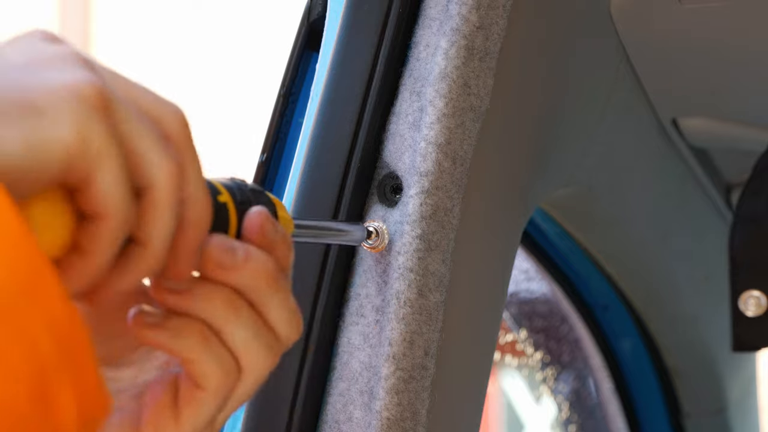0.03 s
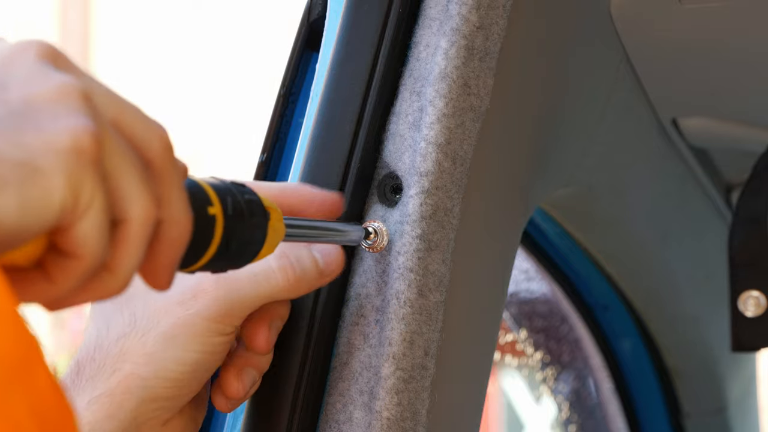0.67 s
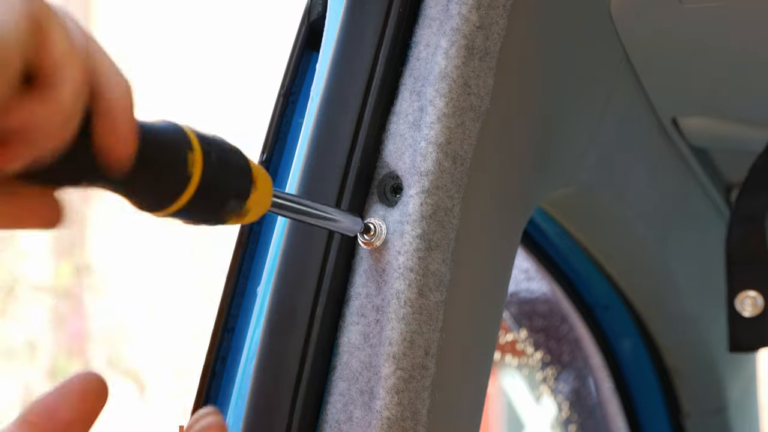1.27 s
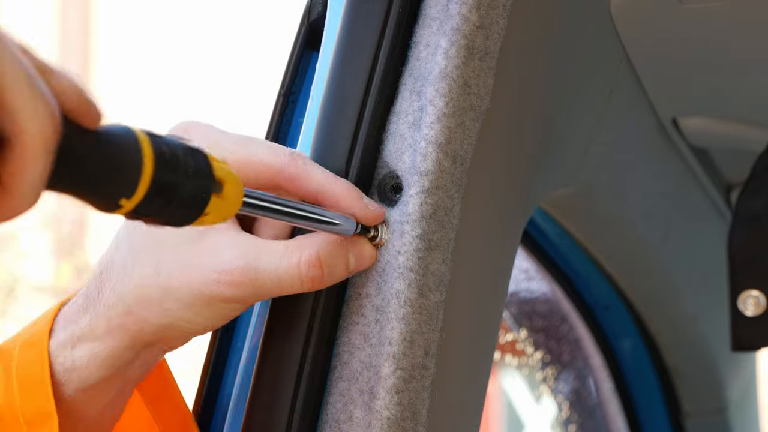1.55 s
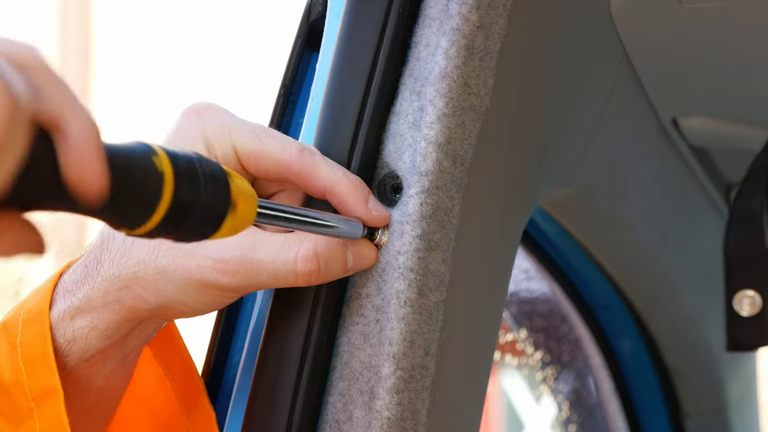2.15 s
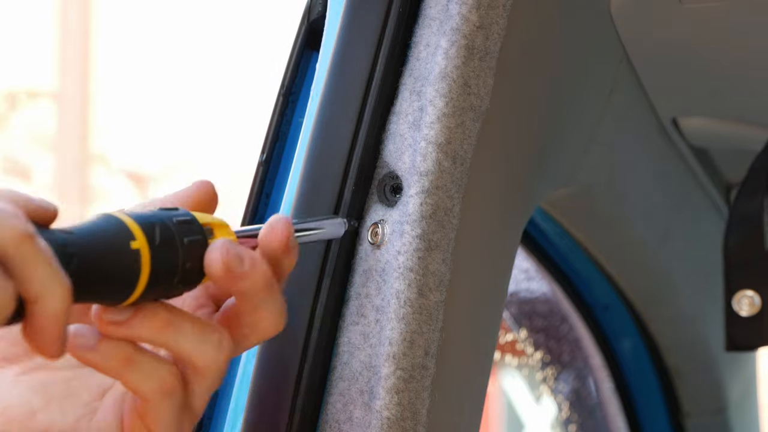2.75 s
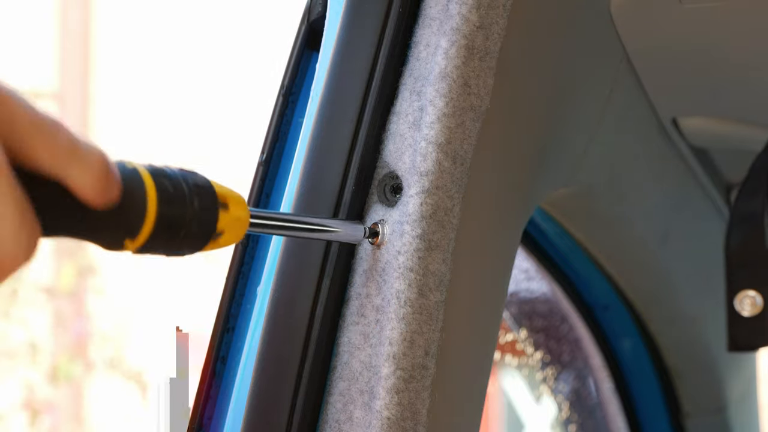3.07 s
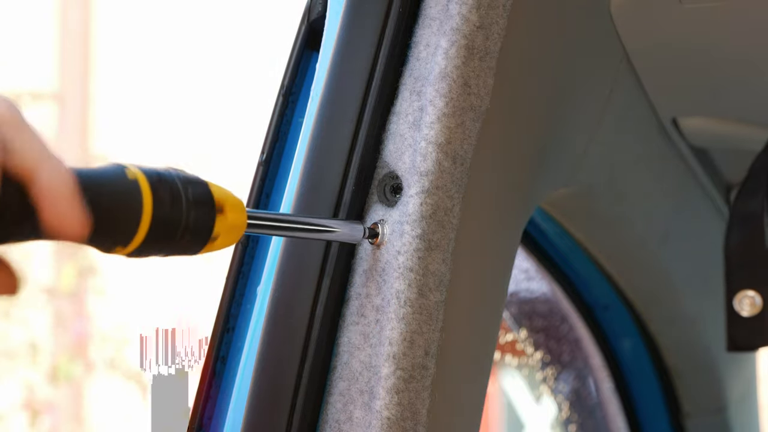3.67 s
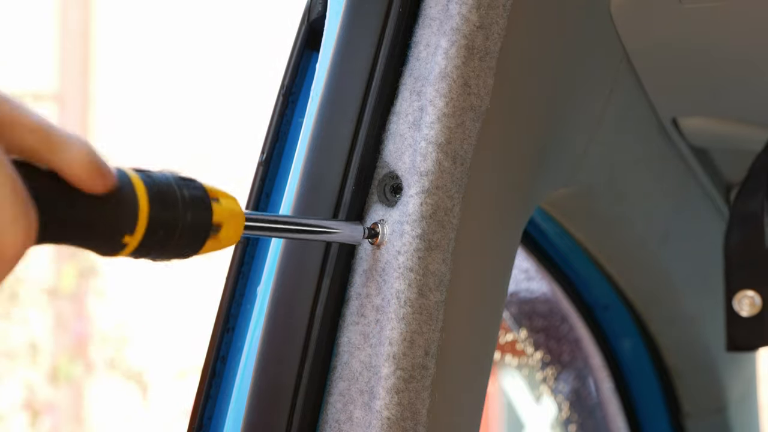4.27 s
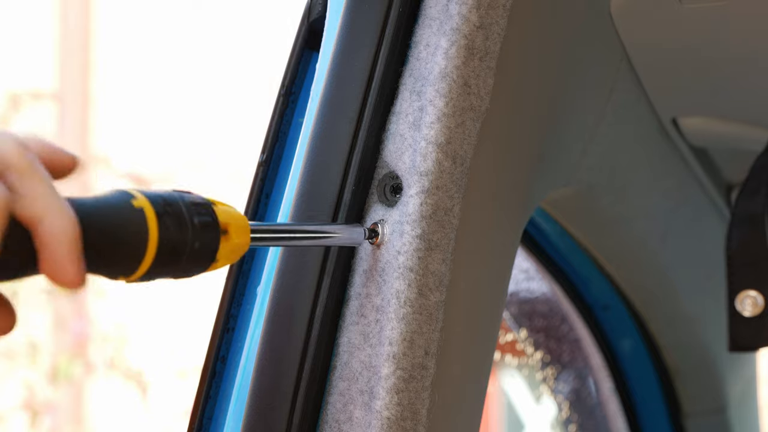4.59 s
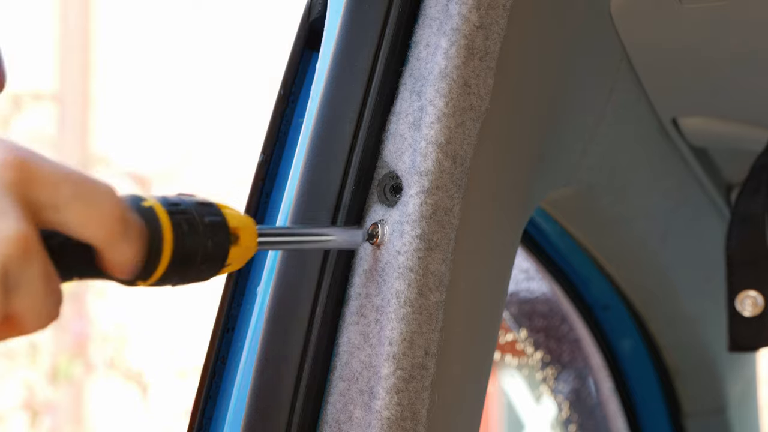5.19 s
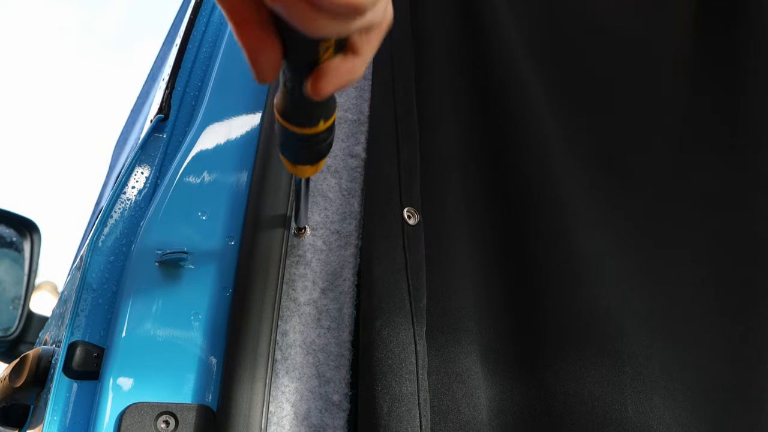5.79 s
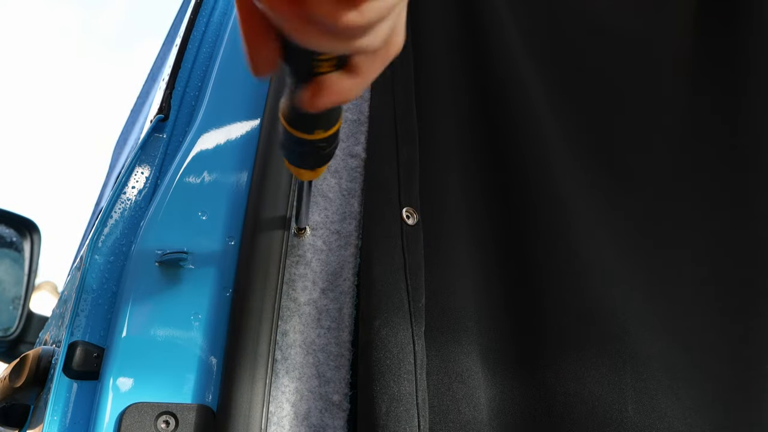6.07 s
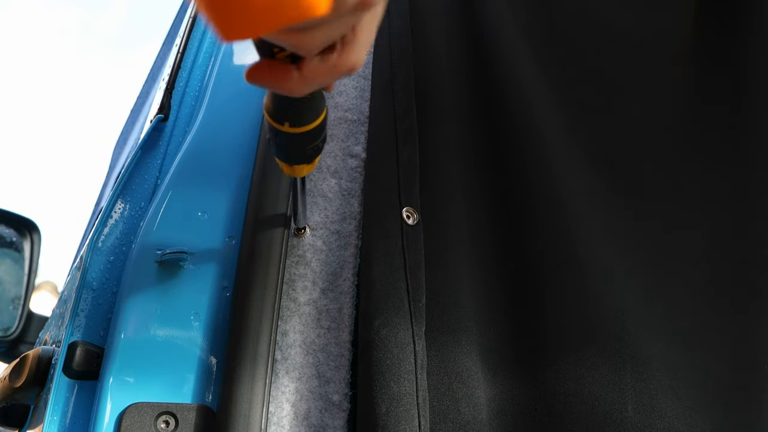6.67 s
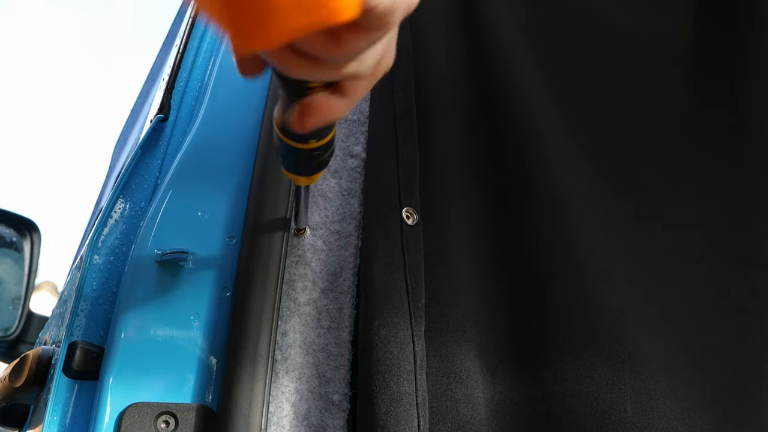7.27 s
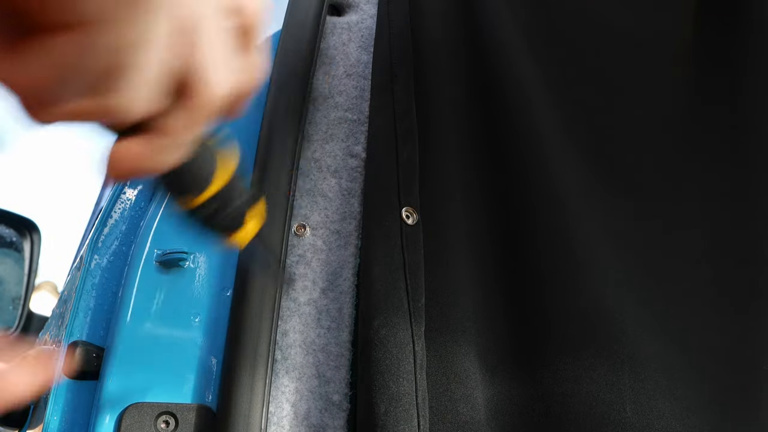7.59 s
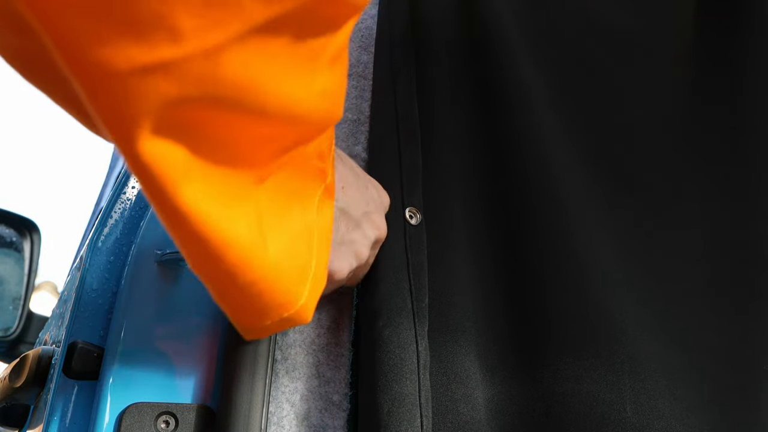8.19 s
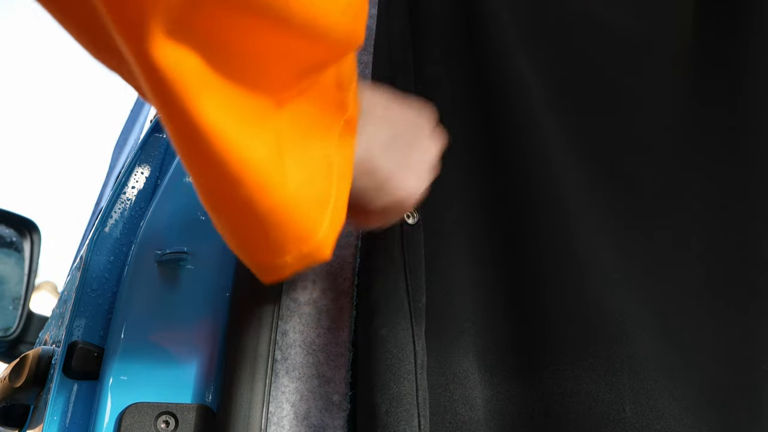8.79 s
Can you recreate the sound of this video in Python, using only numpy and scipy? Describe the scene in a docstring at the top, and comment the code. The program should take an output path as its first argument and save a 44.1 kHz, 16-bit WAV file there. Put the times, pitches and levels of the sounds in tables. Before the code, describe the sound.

Inside a quiet parked van, close to the microphone, sleeves rustle and a ratchet screwdriver starts a small screw with a quick, uneven run of metallic ticks. It settles into regular bursts of three to five sharp clicks, with dull knocks from the hollow trim between them. The clicking ends, the tool taps once as it comes away, and fabric swishes softly over a faint low drone.

```python
"""Ratchet screwdriver in a parked van

Inside the padded cabin, close to a stereo microphone, a small screw is driven into carpeted pillar trim.
Each back-swing snaps the steel pawl over a few teeth; each push knocks the bit in the screw head and
rings the hollow panel. The washer jiggles until the thread bites, and later the thread creaks.
Sleeves rustle, a hand brushes the curtain, and a faint low drone sets in near the end."""
import sys
import numpy as np
from scipy import signal
from scipy.fft import rfft, irfft, next_fast_len
from scipy.io import wavfile

SR = 44100
rng = np.random.default_rng(int(sys.argv[2]) if len(sys.argv) > 2 else 0)


def unload_wav(signal):
    """Save mono or channel-first audio to the path in sys.argv[1] as 16-bit WAV at rate SR, clipped to [-1, 1]."""
    wavfile.write(
        sys.argv[1],
        SR,
        np.round(np.clip(np.atleast_2d(signal).T, -1, 1) * 32767).astype(np.int16),
    )


N = 399105
T = np.arange(N) / SR


def undb(db):
    """Decibels to gain."""
    return 10 ** (np.asarray(db) / 20)


def unit(x):
    """Scale to rms 1."""
    return x / np.sqrt(np.mean(x ** 2) + 1e-20)


def sized(x, db, length_s):
    """Give a short sound the energy of a level held for this length."""
    return x * undb(db) * np.sqrt(length_s * SR / np.sum(x ** 2))


def curves(table):
    """Every column of a timed table, sample by sample."""
    times, *columns = np.transpose(table)
    return [np.interp(T, times, column) for column in columns]


def walk(rate_hz):
    """Smooth random wander with a spread near 1."""
    knots = rng.standard_normal(4096)
    return np.interp(T * rate_hz, np.arange(len(knots)), knots)


def add(track, start_s, sound):
    """Mix a sound into a track."""
    i = max(int(start_s * SR), 0)
    track[i:i + len(sound)] += sound[:max(N - i, 0)]


def passband(x, lo_hz, hi_hz, order=3):
    """Keep one band."""
    edges = np.clip([lo_hz, hi_hz], 20, .45 * SR)
    return signal.sosfilt(signal.butter(order, edges, "band", fs=SR, output="sos"), x)


def shape(x, response):
    """Filter by a response given as a function of frequency."""
    size = next_fast_len(len(x) + 2048)
    freqs = np.fft.rfftfreq(size, 1 / SR) + 1e-3
    return irfft(rfft(x, size) * response(freqs), size)[:len(x)]


def resonance(f, hz, width_hz):
    """Response of one resonance."""
    return 1 / (1 + 1j * (f * f - hz * hz) / (f * width_hz))


def resonate(force, modes):
    """Pass a force through resonances: pitch_hz, width_hz, gain_db."""
    return shape(force, lambda f: sum(undb(db) * resonance(f, hz, width) for hz, width, db in modes))


def colour(x, points):
    """Give a sound a spectrum: frequency_hz, gain_db."""
    hz, db = np.transpose(points)
    return shape(x, lambda f: undb(np.interp(np.log(f), np.log(hz), db)))


def narrow_noise(samples, hz, width_hz):
    """Noise gathered around one pitch, at rms 1."""
    return unit(shape(rng.standard_normal(samples), lambda f: resonance(f, hz, width_hz) ** 2))


def friction(length_s, grit_db=3):
    """Gritty friction force that swells quickly and dies away."""
    t = T[:int(SR * .3)]
    grit = undb(grit_db * np.repeat(rng.standard_normal(len(t)), 40)[:len(t)])
    envelope = (1 - np.exp(-t / (.1 * length_s))) * np.exp(-(t / length_s) ** 2)
    return rng.standard_normal(len(t)) * grit * envelope


def strike(modes, detune=.04, bounce=.59, bounce_s=.0014, lo_hz=1250, scatter_db=1.3):
    """A hard contact bounces six times in an instant and rings short modes; rms 1 over its first 4 ms."""
    t = T[:1024]
    hz, t60, db = np.transpose(modes)[:, :, None]
    mistune, scatter, phase = rng.standard_normal((3, len(modes), 1))
    decay = undb(db + scatter_db * scatter - 60 * t / t60)
    ring = (decay * np.sin(2 * np.pi * (hz * (1 + detune * mistune) * t + phase))).sum(0)
    force = np.zeros(len(t))
    force[0] = 1
    for late, strength in rng.random((6, 2)):
        add(force, late * bounce_s, [bounce * strength])
    click = passband(signal.fftconvolve(force, ring)[:len(t)], lo_hz, 11100, order=2)
    return click / np.sqrt(np.mean(click[:176] ** 2))


def cabin_reverb(x, wet_db, t60_s, dull_hz=9200):
    """Add the dense, short reflections of the padded cabin."""
    t = T[:SR // 3]
    tail = rng.standard_normal(len(t)) * undb(-60 * t / t60_s) * (1 - np.exp(-t / .0015))
    tail = shape(tail / np.sqrt(np.sum(tail ** 2)), lambda f: 1 / (1 + 1j * f / dull_hz))
    return x + undb(wet_db) * signal.fftconvolve(x, tail)[:len(x)]


# Room tone inside the parked van: frequency_hz, gain_db
AIR_SPECTRUM = [(15, -57), (25, -37.5), (137, -1.5), (285, 10.5), (405, 3.5), (1190, -3.5), (2840, -17.5),
                (4490, -8.5), (6210, -17.5), (8360, -23.5), (12500, -31.5), (16000, -59)]
def cabin_air(level_db=-57):
    """The steady hush of the still cabin."""
    return unit(colour(rng.standard_normal(N), AIR_SPECTRUM)) * undb(level_db)


# Low drone, far behind the work: pitch_hz, gain_db
DRONE_TONES = [(129, -3.5), (156, -5.5), (291, -9)]
# Its rise near the end: time_s, level_db
DRONE_SWELL = [(0, -106), (7.4, -65), (7.8, -62), (8.4, -54), (9.05, -57.5)]
def drone(waver_hz=2.1, waver_db=2):
    """Three low tones swell, each wavering in pitch and level."""
    out = np.zeros(N)
    swell_db, = curves(DRONE_SWELL)
    for hz, db in DRONE_TONES:
        phase = 2 * np.pi * np.cumsum(hz + waver_hz * walk(32)) / SR
        out += np.sqrt(2) * np.sin(phase) * undb(swell_db + db - waver_db * walk(9.2))
    return out


# Faint whistles in the background: start_s, level_db, pitch_hz, length_s
WHISTLES = [(5.6, -56.5, 1795, 0.33), (8.173, -56, 1790, 0.24)]
def whistle():
    """A thin, breathy tone comes and goes."""
    out, t = np.zeros(N), T[:SR]
    for s, db, hz, length in WHISTLES:
        envelope = np.sqrt(t) * np.exp(-(t / length) ** 2)
        add(out, s, sized(narrow_noise(SR, hz, width_hz=170) * envelope, db, length))
    return out


# Fabric heard from close by: frequency_hz, gain_db
CLOTH_SPECTRUM = [(24, -62.5), (40, -21), (101, -5), (269, -0.5), (455, -2.5), (918, -9), (1240, -10),
                  (1900, -11), (3060, -13.5), (3650, -13), (4570, -16.5), (5870, -16), (9450, -26.5),
                  (13800, -48.5), (16000, -64)]
# An arm moves or a palm sweeps the curtain: middle_s, half_length_s, level_db, relative_hiss_db
SWISHES = [(0, 0.05, -48.5, -1), (.3, 0.14, -47.5, -4), (.475, 0.086, -41.5, -14), (.58, 0.069, -49.5, -12),
           (.92, 0.094, -53.5, 0), (1.3, 0.16, -47, -3), (2.55, 0.34, -56.5, -6), (2.99, 0.22, -50.5, -5.5),
           (4.78, 0.82, -52, -7), (5.18, 0.73, -65, 0.5), (6.45, 0.24, -53, -2.5), (7.7, 0.2, -53, 0),
           (8.05, 0.096, -41.5, -4.5), (8.21, 0.13, -48.5, -6.5), (8.82, 0.051, -52.5, -2)]
# The hands hesitate: middle_s, half_length_s, change_db
PAUSES = [(0.716, 0.051, -4.5), (2.86, 0.035, -7), (5.363, 0.015, -6), (6.91, 0.025, -3),
          (7.26, 0.034, 0.5)]
def cloth(stir_db=-62.5, drive_lag_s=.077, drive_half_s=.14, drive_hiss_db=-1.5):
    """Each move swells and fades: folds flap low, fabric rubs in the middle, catching fibres hiss."""
    # the sleeve follows the driving stroke after each catch of the bit
    drives = [(catch_s + drive_lag_s, drive_half_s, db, drive_hiss_db)
              for _, _, catch_s, _, db in WRIST_TURNS]
    stir = undb(stir_db)  # cloth is never quite still while the hands work
    rub, hiss = stir, stir * undb(-1)
    for s, half, db, hiss_db in [*SWISHES, *drives]:
        swell = undb(db) / (1 + ((T - s) / half) ** 2 / 2) ** 2
        rub, hiss = np.hypot(rub, swell), np.hypot(hiss, swell * undb(hiss_db))
    lull = undb(sum(db * np.exp(-((T - s) / half) ** 2) for s, half, db in PAUSES))
    rub, hiss = rub * lull, hiss * lull
    flap = undb(1) * stir * (rub / stir) ** .75  # flapping grows more slowly than rubbing
    crinkle = undb(2 * walk(350) + 2 * walk(35))
    out = np.zeros(N)
    for envelope, lo_hz, hi_hz in (flap, 58, 570), (rub, 600, 3380), (hiss, 3500, 12000):
        fibres = colour(rng.standard_normal(N) * crinkle, CLOTH_SPECTRUM)
        out += envelope * unit(passband(fibres, lo_hz, hi_hz))
    return out


# Fingers on tool, trim and curtain, near the microphone: start_s, level_db, centre_hz, length_s
FINGER_RUBS = [(0.431, -46.5, 2740, 0.066), (0.337, -47, 105, 0.027), (1.124, -47, 2090, 0.036),
               (1.193, -43, 122, 0.025), (1.319, -40, 2300, 0.025), (6.778, -50, 1350, 0.059),
               (8.154, -44, 5900, 0.021), (8.155, -44, 730, .018)]
def fingers():
    """Each brush of a finger is a short burst of friction about an octave wide."""
    out = np.zeros(N)
    for s, db, hz, length in FINGER_RUBS:
        rub = passband(friction(length), hz / 1.43, hz * 1.45, order=4)
        add(out, s, sized(rub, db, length))
    return out


# Taps as the tool is taken from the pillar: start_s, level_db
TAPS = [(7.7794, -21.5), (7.7819, -26), (7.7852, -21), (7.8415, -40), (7.8527, -47)]
# The handle's ring: pitch_hz, t60_s, gain_db
HANDLE_MODES = [(1230, 0.011, -2.5), (1400, 0.0077, 1), (3060, 0.0053, -3.5), (4430, 0.0054, 5.5),
                (5000, 0.005, -5), (6400, 0.0021, -2.5), (7560, 0.0036, -15)]
def handle_taps():
    """Bouncing contacts briefly ring the handle."""
    out = np.zeros(N)
    for s, db in TAPS:
        tap = strike(HANDLE_MODES, detune=.013, bounce=1.1, bounce_s=.0035, lo_hz=516)
        add(out, s, undb(db) * passband(tap, 1040, 8700))
    return out


# One creak of the screw in the pillar: time_s, slip_rate_hz, level_db
CREAK = [(6.465, 214, -59), (6.48, 207, -43), (6.497, 180, -52), (6.503, 45, -64), (6.51, 135, -34),
         (6.522, 120, -46.5), (6.538, 150, -42), (6.548, 120, -77)]
# Its resonances: pitch_hz, width_hz, gain_db
THREAD_MODES = [(2670, 380, 11.5), (3450, 290, 5), (4520, 170, 10.5), (6270, 260, 6), (8500, 900, -22)]
def thread_creak():
    """The thread sticks and slips, sending uneven pulses through its resonances."""
    rate_hz, db = curves(CREAK)
    slip_count = np.floor(np.cumsum(rate_hz * (1 + .5 * walk(69)) / SR))
    slips = np.diff(slip_count, prepend=0)
    creak = passband(resonate(slips, THREAD_MODES), 1500, 8050)
    return unit(creak) * undb(db) * (T > CREAK[0][0]) * (T < CREAK[-1][0])


# While the screw is still loose in the trim: start_s, end_s
LOOSE_SPAN = (1.25, 2.45)
# The washer's ring: pitch_hz, t60_s, gain_db
WASHER_MODES = [(3900, .025, -19), (5850, .03, -18), (6330, .03, -12), (6650, .03, -11), (6980, .03, -15),
                (11950, .04, -36)]
def washer(jiggle_db=-40, spread_db=12, scatter_db=6, jiggle_s=.06):
    """Until the thread bites, each snap rings the washer in a new mix of modes and sets it jiggling."""
    out, t = np.zeros(N), T[:4096]
    start, end = LOOSE_SPAN
    for s, db, _ in PAWL_SNAPS:
        if start < s < end:
            for hz, t60, ring_db in WASHER_MODES:
                decay = undb(db + ring_db + scatter_db * rng.normal() - 60 * t / t60)
                add(out, s, decay * np.sin(2 * np.pi * hz * rng.normal(1, .012) * t))
            for late, weakness in rng.random((3, 2)):
                tick = steel_click(treble_db=-3)
                add(out, s + late * jiggle_s, undb(jiggle_db - spread_db * weakness) * tick)
    return out


def screw_wobble(level_db=-46, spread_db=.5, centre_hz=484, length_s=.014, count=14):
    """The loose screw wobbles under the bit and nudges the trim: extra knock rows at uneven moments."""
    jitter, strengths = rng.uniform(-.9, 1, (count, 2)).T
    times = np.interp(np.arange(count) + jitter / 2, [0, count - 1], LOOSE_SPAN)
    return [(s, level_db + spread_db * k, centre_hz, length_s) for s, k in zip(times, strengths)]


# The bit presses into the screw, lets go or catches: start_s, level_db, centre_hz, length_s
BIT_KNOCKS = [(1.162, -38, 477, 0.0077), (1.232, -41.5, 430, 0.011), (1.342, -49, 315, 0.016),
              (1.367, -40, 350, 0.0074), (1.474, -38, 485, 0.0056), (1.492, -52, 750, 0.007),
              (1.655, -40, 386, 0.012), (1.862, -38.5, 487, 0.0079), (2.052, -38, 720, 0.0087),
              (2.123, -41, 780, 0.011), (2.217, -36, 547, 0.015), (2.264, -40, 660, 0.0092),
              (2.33, -37, 590, 0.013), (2.434, -43, 560, 0.018), (2.526, -39, 584, 0.013),
              (2.592, -36.5, 382, 0.0084), (2.646, -33.5, 626, 0.01), (2.86, -35.5, 527, 0.008),
              (2.895, -33.5, 410, 0.01), (3.251, -37, 683, 0.012), (3.262, -29.5, 622, 0.022),
              (3.338, -34, 644, 0.022), (3.415, -42, 338, 0.017), (3.441, -37.5, 593, 0.024),
              (3.4592, -27, 557, 0.012), (3.468, -30, 460, 0.0084), (3.666, -37, 500, .014),
              (3.68, -28.5, 374, 0.014), (3.739, -44, 756, 0.013), (3.828, -34.5, 760, 0.0073),
              (3.844, -28, 397, 0.011), (3.872, -43.5, 486, 0.01), (4.0443, -35, 387, 0.027),
              (4.054, -29.5, 650, 0.018), (4.212, -34, 600, .014), (4.2378, -28.5, 463, 0.017),
              (4.498, -39, 703, 0.012), (4.506, -31.5, 637, 0.027), (4.894, -40.5, 420, 0.032),
              (4.945, -36.5, 630, 0.015), (5.262, -42.5, 685, 0.014), (5.384, -37.5, 594, .018),
              (5.455, -43, 760, 0.018), (5.548, -39, 630, 0.024), (5.729, -39, 770, 0.0075),
              (5.74, -32.5, 510, 0.019), (5.875, -34.5, 686, 0.0091), (5.898, -32.5, 543, 0.015),
              (6.069, -35, 740, 0.0069), (6.081, -30.5, 430, 0.014), (6.225, -33.5, 556, 0.013),
              (6.236, -32, 628, 0.014), (6.426, -42, 553, 0.017), (6.451, -42, 410, 0.006),
              (6.462, -37.5, 251, 0.015), (6.611, -41.5, 570, 0.019), (6.659, -41, 580, 0.015),
              (6.95, -38.5, 600, 0.01), (6.97, -35.5, 626, 0.021), (7.134, -41, 520, .01),
              (7.148, -38, 625, .014), (7.16, -32, 395, 0.0085), (7.299, -38.5, 610, 0.0086),
              (7.317, -34, 680, 0.015), (7.451, -30, 343, 0.0083), (7.468, -30.5, 408, 0.007),
              (7.48, -32, 244, 0.0073)]
# Hollow pillar trim, close to the microphone: pitch_hz, width_hz, gain_db
PANEL_MODES = [(164, 31, 3), (206, 36, 3.5), (313, 30, 2), (355, 46.4, 2.5), (485, 39, 2.5),
               (585.6, 44, -4), (645, 23, -7), (797, 120, -3), (885, 80, -12.5), (1015, 46, -13),
               (1320, 900, -6.5), (2140, 720, -19)]
def trim_panel(gain_db=2.5, recoil_db=-28, recoil_hz=650, recoil_s=.017, blow_s=.003, travel_s=.00506):
    """Knocks of the bit, the screw's wobble and the recoil of each snap ring the hollow panel."""
    out = np.zeros(N)
    recoils = [(s, db + recoil_db, recoil_hz, recoil_s) for s, db, _ in PAWL_SNAPS]
    for s, db, hz, length in [*BIT_KNOCKS, *screw_wobble(), *recoils]:
        force = friction(length)
        add(force, blow_s, [3.4])  # one sharp blow within the friction
        # bending waves: high notes arrive first, so each knock falls in pitch
        force = shape(force, lambda f: resonance(f, hz, .8 * hz)
                      * np.exp(-4j * np.pi * travel_s * np.sqrt(f * hz)))
        # the hand's pressure shifts and reweights the panel's modes
        modes = [(pitch * rng.normal(1, .018), width, mode_db + 3 * rng.normal())
                 for pitch, width, mode_db in PANEL_MODES]
        knock = passband(resonate(force, modes), 112, 1660)
        add(out, s - blow_s - travel_s, sized(knock, db + gain_db, length))
    return out


def bit_scrape(gain_db=-11, lead_s=.005):
    """Under each push the bit grinds in the screw head with fine metallic grains."""
    out = np.zeros(N)
    for s, db, _, length in BIT_KNOCKS:
        grains = passband(friction(.94 * length, grit_db=8), 2140, 6050)
        add(out, s - lead_s, sized(grains, db + gain_db, length))
    return out


def shaft(pitch_hz=6370, ring_db=-33.5, t60_s=.23, rattle_db=-30.5, rattle_s=.038, fall_db=13.5):
    """After each snap, closely spaced bending modes of the shaft ring on and the loose collar rattles."""
    out, t = np.zeros(N), T[:8192]
    for s, db, _ in PAWL_SNAPS:
        ring = narrow_noise(len(t), pitch_hz, width_hz=1100)
        add(out, s, ring * undb(db + ring_db - 60 * t / t60_s))
        tick = steel_click(treble_db=-13)
        for late in rng.random(3):
            add(out, s + late * rattle_s, undb(db + rattle_db - fall_db * late) * tick)
    return out


# Steel ratchet and shaft at close range: pitch_hz, t60_s, gain_db
STEEL_MODES = [(1860, 0.0071, -34.5), (2660, 0.0033, -5.5), (3110, 0.0091, -11), (3930, 0.0033, 2),
               (4500, 0.011, -6), (5420, 0.0028, 2), (6260, 0.0032, 1), (6766, 0.0063, 0.5),
               (7410, 0.0033, 1), (8480, 0.0059, -6.5), (9580, 0.012, -19), (12150, 0.017, -18)]
def steel_noise(samples, breadth, lo_hz, hi_hz):
    """Noise coloured by the steel at rms 1; the faster a mode dies, the wider its band."""
    modes = [(hz, breadth / t60, db) for hz, t60, db in STEEL_MODES]
    return unit(passband(resonate(rng.standard_normal(samples), modes), lo_hz, hi_hz, order=2))


def steel_click(treble_db, split_hz=5200, tail_db=-19, tail_t60_s=.095):
    """Struck steel with a diffuse cabin tail; treble_db sets the band above the split over that below."""
    t = T[:6000]
    # reflections from all sides carry the tool's average colour
    click = undb(tail_db - 60 * t / tail_t60_s) * steel_noise(len(t), 2, lo_hz=1980, hi_hz=8180)
    add(click, 0, strike(STEEL_MODES))
    rms = click.std()
    if treble_db < 0:  # a soft contact loses its very top
        click = passband(click, 300, 12000 * 2 ** (treble_db / 54), order=2)
    low = shape(click, lambda f: 1 / (1 + (f / split_hz) ** 8))
    return unit(unit(low) + undb(treble_db) * unit(click - low)) * rms


# The tool touches screw and trim: start_s, level_db
TOOL_TOUCHES = [(.238, -46.5), (1.287, -44.5), (1.592, -49), (1.721, -38), (1.81, -45), (1.861, -49),
                (2.24, -49), (2.32, -50), (2.118, -42), (2.2063, -42), (2.33, -39), (2.431, -34.5),
                (2.858, -39), (5.262, -40), (5.267, -41.5), (5.395, -42), (6.452, -48), (7.145, -50),
                (7.319, -39), (7.4687, -32.5), (7.9439, -37.5), (7.9845, -37.5), (8.267, -42)]
# Swings of the wrist at the pillar: release_s, release_db, catch_s, catch_db, sleeve_db
WRIST_TURNS = [(3.256, -35, 3.4544, -20.5, -54.5), (3.667, -34, 3.843, -48, -55.5),
               (4.0438, -33, 4.2385, -33.5, -56.5), (4.4998, -29.5, 4.942, -30, -64),
               (5.382, -48, 5.549, -37.5, -55), (5.733, -43.5, 5.874, -39, -59.5),
               (6.0774, -29.5, 6.2344, -24, -55.5), (6.424, -53, 6.658, -35.5, -56.5),
               (6.9481, -42, 7.1576, -17.5, -69), (7.3, -37, 7.4736, -25.5, -52)]
def bit_clicks(touch_gain_db=5.5):
    """The bit clicks dully as it touches, lets go for the back-swing and catches again."""
    out = np.zeros(N)
    for s, db in TOOL_TOUCHES:
        add(out, s, undb(db + touch_gain_db) * steel_click(treble_db=-10))
    for release_s, release_db, catch_s, catch_db, _ in WRIST_TURNS:
        add(out, release_s, undb(release_db) * steel_click(treble_db=-10))
        add(out, catch_s, undb(catch_db) * steel_click(treble_db=-15))
    return out


# The pawl, close and central at the microphone, one row a tooth: start_s, level_db, treble_db
PAWL_SNAPS = [(1.3177, -17.5, 4.5), (1.4012, -26, 7), (1.4365, -22.5, 7.5), (1.4739, -21.5, 1.5),
              (1.561, -25, 11), (1.6209, -21.5, 6.5), (1.705, -25.5, 2), (1.7572, -20, 5.5),
              (1.7898, -24.5, 9), (1.828, -28.5, 13), (1.8474, -25, 2.5), (1.8862, -24, 3),
              (1.935, -19.5, 6), (1.985, -20.5, 3), (2.0251, -21, 6), (2.0482, -21, 5), (2.0987, -21.5, 9),
              (2.1772, -25.5, 6.5), (2.249, -25, 11), (2.293, -24.5, 0), (2.371, -18, 7),
              (2.4247, -28.5, 3), (2.5264, -16.5, 6.5), (2.5784, -28, 0), (2.6438, -29, -4.5),
              (3.284, -13.5, 4.5), (3.2993, -15.5, 12.5), (3.3144, -12.5, -5), (3.332, -15.5, -1),
              (3.3558, -15.5, 8.5), (3.6988, -15, 1), (3.7185, -15, 14), (3.741, -15.5, 0),
              (3.7747, -17, 4), (4.0781, -14.5, 10), (4.0977, -14.5, -0.5), (4.1213, -16, 5),
              (4.1499, -16.5, 5), (4.5521, -11, 6), (4.5854, -14.5, 5.5), (4.6226, -16, 4.5),
              (4.6883, -16, 3.5), (4.772, -14, 1), (5.4116, -12, 0), (5.4303, -18, 9.5), (5.4525, -15, 4),
              (5.4894, -16, -0.5), (5.7725, -12, 1), (5.7956, -15, 4), (5.831, -16, 6),
              (6.108, -12.5, -0.5), (6.1334, -14, 2), (6.1748, -16, 7), (7.0092, -11, 0.5),
              (7.033, -14, -2.5), (7.069, -15, -1.5), (7.3833, -12.5, 2.5)]
def pawl(slide_db=-15.5, slide_s=.00066, creep=.057, creep_s=.026):
    """The pawl creeps up a tooth, slides over its crest and snaps down."""
    out = np.zeros(N)
    t = T[:2048] - T[2048]  # time leading up to the snap
    climb = np.exp(t / slide_s) + creep * np.exp(t / creep_s)
    for s, db, treble_db in PAWL_SNAPS:
        add(out, s, undb(db) * steel_click(treble_db))
        slide = steel_noise(len(t), 2.2, lo_hz=2960, hi_hz=10000)
        add(out, s + t[0], undb(db + slide_db) * slide * climb)
    return out


def scene(reflections_db=-24.5, diffuse_cloth_db=-27, hiss_db=-71):
    """Close and central; faint reflections, cloth rustle and a soft steady hiss differ left and right."""
    background = cabin_air() + drone() + whistle()
    touches = fingers() + handle_taps() + thread_creak() + bit_scrape()
    touches = cabin_reverb(touches, wet_db=-12, t60_s=.11)
    panel = cabin_reverb(trim_panel(), wet_db=-10.5, t60_s=.15)
    tool = touches + panel + washer() + shaft() + bit_clicks() + pawl()
    mid = background + cloth() + tool
    reflections = cabin_reverb(tool, wet_db=-9.5, t60_s=.06) - tool
    hiss = unit(passband(rng.standard_normal(N), 22, 3500, order=1))
    side = undb(reflections_db) * reflections + undb(diffuse_cloth_db) * cloth() + undb(hiss_db) * hiss
    return np.array([mid + side, mid - side])


def record(dry, roll_off_hz=14100, ceiling=.78, cutoff_hz=16200):
    """The recorder softens the top octave, rounds the tallest peaks and cuts off the top."""
    soft = passband(dry, 27, roll_off_hz, order=2)
    rounded = soft / (1 + np.abs(soft / ceiling) ** 6) ** (1 / 6)
    return signal.sosfilt(signal.ellip(10, .2, 90, cutoff_hz, fs=SR, output="sos"), rounded)


dry = scene()
out = record(dry)
unload_wav(out)
```